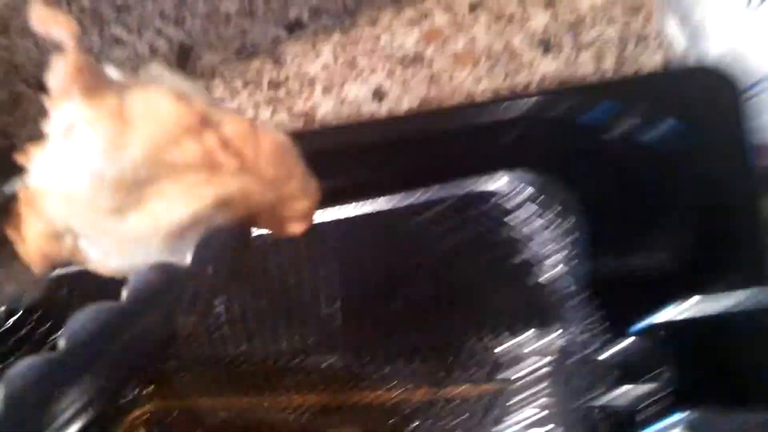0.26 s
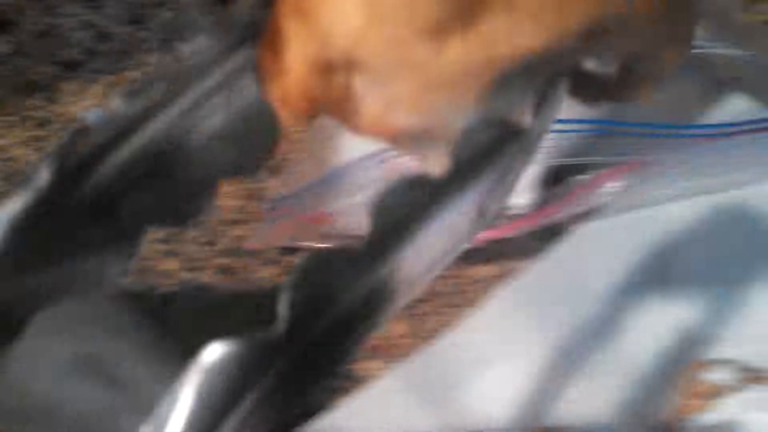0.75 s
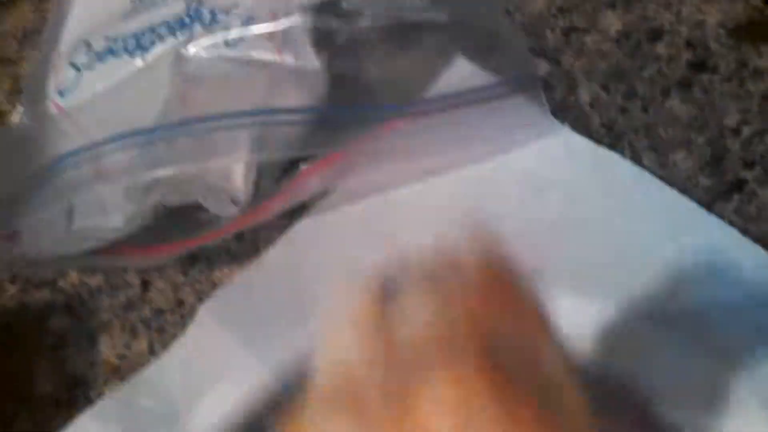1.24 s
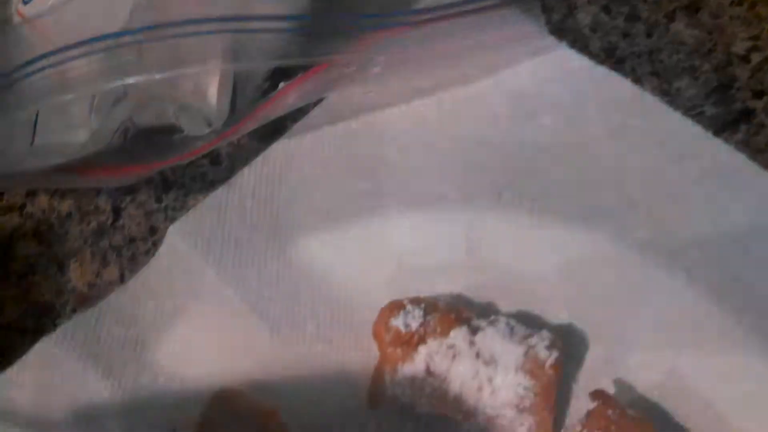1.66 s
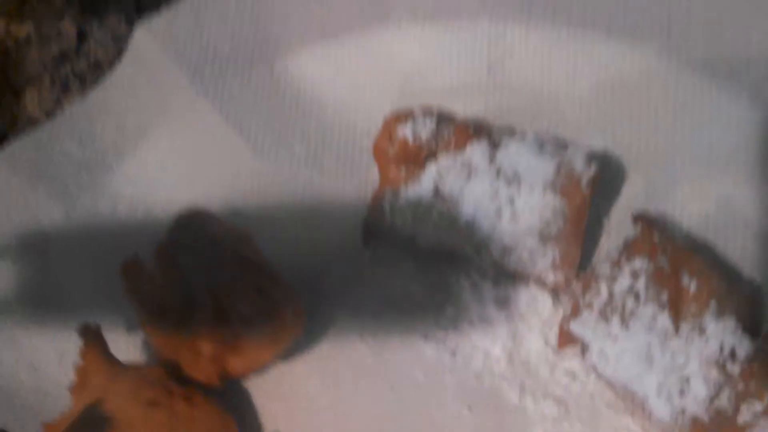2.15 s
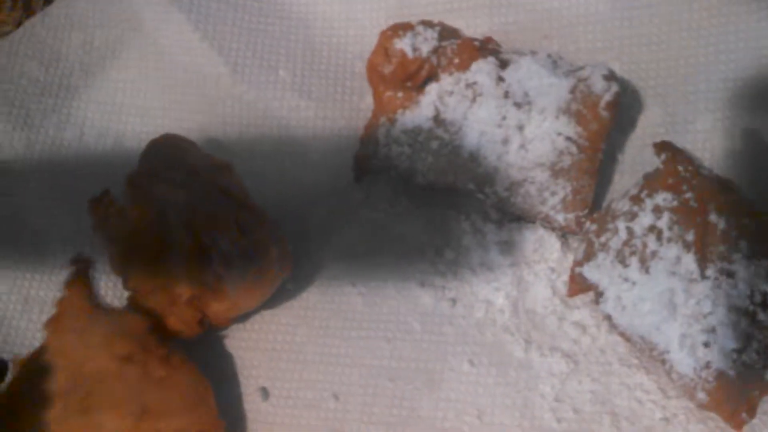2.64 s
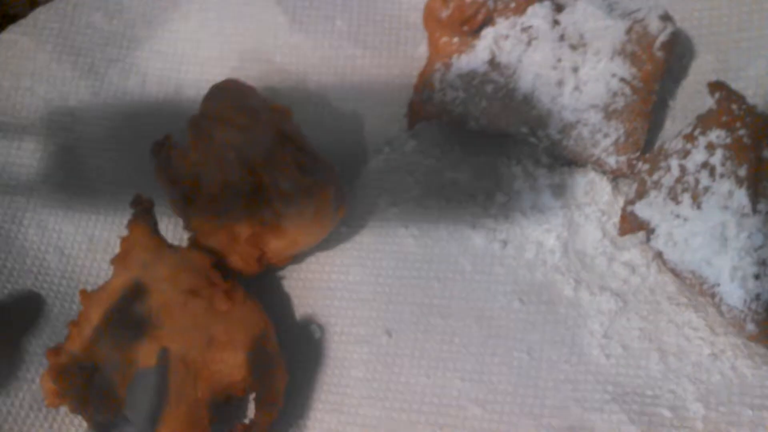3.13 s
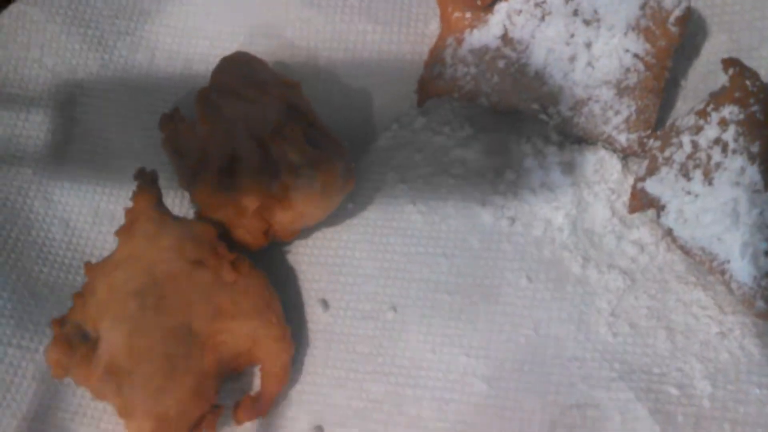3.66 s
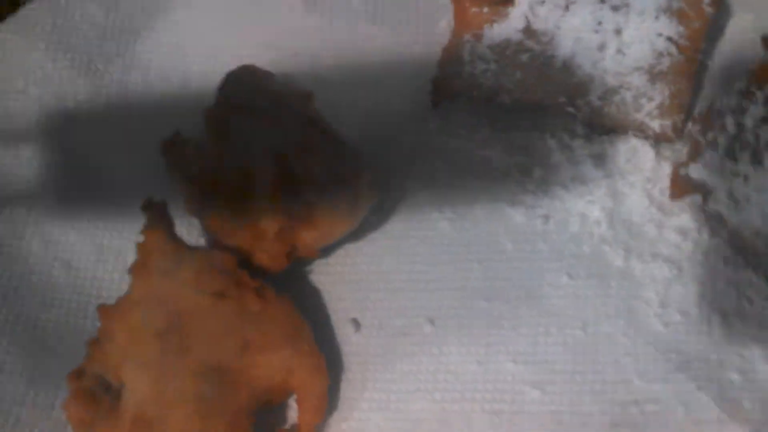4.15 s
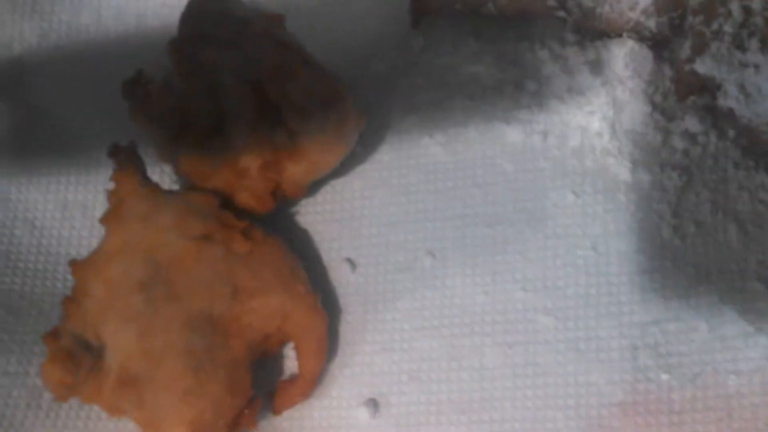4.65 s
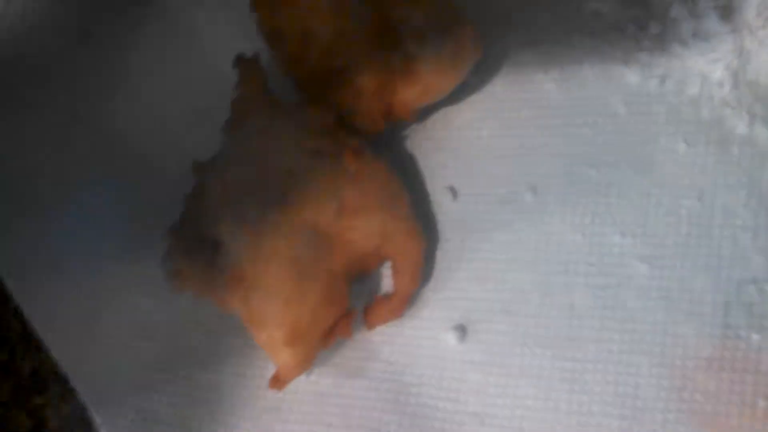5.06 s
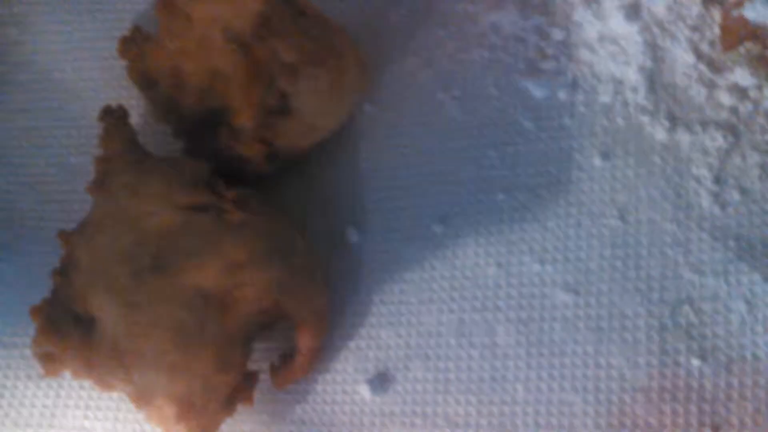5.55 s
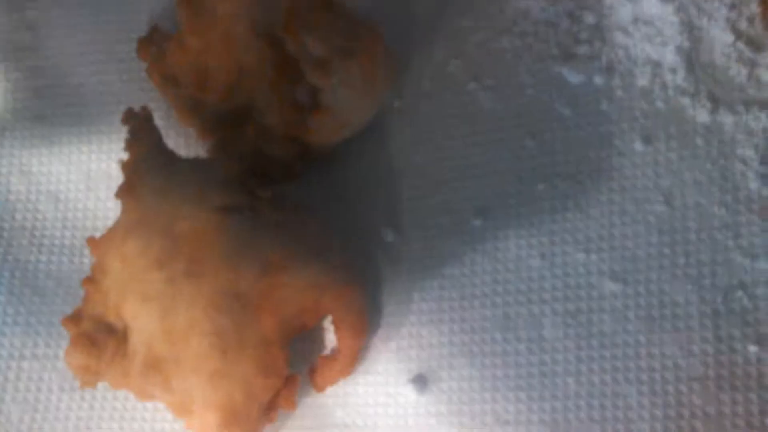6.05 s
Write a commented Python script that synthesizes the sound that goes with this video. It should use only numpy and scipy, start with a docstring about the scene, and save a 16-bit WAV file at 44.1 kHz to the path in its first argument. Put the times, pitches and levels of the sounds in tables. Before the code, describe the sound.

Close in a small kitchen, a few tiny oil spits crackle over soft air noise and faint low hum. Light, dry taps and brief steel scrapes come in uneven clusters as tongs set fried pastry on paper over a plate. After a pause, the tongs land on stone in three short ringing clanks, the middle one strongest. Finally a sharp knock and scrape open two plastic-bag rustles, with quick dull and clicky knocks to the end.

```python
"""Small kitchen: steel tongs lift a fried pastry from spitting oil onto a paper towel over a plate.
Knocks are noise rattles, harder contacts centred higher; scrapes are shaped runs of slips; bumps swing low.
The tongs land on the stone counter in three ringing clanks, built from steel modes.
Something, likely a plastic bag, is pulled twice and rustles: clumped snaps, creases. Air noise and hum lie behind.
Two close microphones are cross-subtracted into stereo."""
import sys
import numpy as np
from scipy import signal
from scipy.fft import rfft, irfft
from scipy.io import wavfile
from scipy.ndimage import uniform_filter1d

SR = 44100
rng = np.random.default_rng(int(sys.argv[2]) if len(sys.argv) > 2 else 0)


def put_to_file(sound):
    """Save the sound as 16-bit audio at rate SR, in the file named by the first command-line argument."""
    columns = np.atleast_2d(sound).T  # one column per channel
    safe = np.clip(columns, -1, 1)
    whole_steps = np.round(safe * 32767)
    wavfile.write(sys.argv[1], SR, whole_steps.astype(np.int16))


N = 277830

# air noise level: t/s, level/dB
AIR_LEVEL = [(0.0, -54.5), (0.56, -51), (1.55, -55.5), (2.13, -53), (3.68, -54), (4.57, -49.5),
             (4.95, -58.5), (5.4, -53)]
# spectra of air noise, bag film, sliding steel: f/Hz, level/dB
AIR_COLOUR = [(30, -18.5), (65, 2), (100, -2.5), (150, 0), (300, -0.5), (500, -4), (800, -12.5),
              (1200, -14.5), (2000, -16), (4000, -20.5), (7000, -23.5), (10300, -38.5), (12000, -34),
              (15500, -35)]
BAG_COLOUR = [(60, -36.5), (200, -3), (450, 0), (750, 1), (1100, 1), (1600, -2), (2400, -3), (3600, -8),
              (4600, -5.5), (6000, -7.5), (8000, -8), (9800, -18), (15500, -23)]
SLIDE_COLOUR = [(100, -64), (400, 10), (1200, 13.5), (2600, 15.5), (4200, 8), (7300, 8), (9800, -6),
                (15500, -15)]
# room decay: f/Hz, t60/s
ROOM_DECAY = [(150, 1), (600, 0.57), (1500, 0.27), (4000, 0.48), (8000, 0.47), (14000, 0.16)]
# pulls on the bag: start/s, swell/s, hold/s, level/dB
BAG_PULLS = [(5.435, 0.038, 0.2, -49), (5.738, 0.04, .55, -41.5)]
# loudest spits of hot oil: t/s, level/dB
LOUD_SPITS = [(0.175, -55), (0.289, -47.5), (0.315, -56), (0.543, -54), (0.6, -50.5), (0.672, -55),
              (0.792, -54), (1.108, -53)]
# slides of steel on mesh, paper, stone: t/s, length/s, level/dB, tilt/(dB/octave), peak/(share of length)
STEEL_SLIDES = [(0.348, 0.055, -50, -27, .3), (1.7, 0.018, -57, 2, 0.2), (1.881, 0.15, -48.5, -1, 0.36),
                (2.379, 0.079, -53, 1, 0), (2.479, 0.065, -51, 0.5, 0), (2.642, 0.11, -48, 0.5, 0.3),
                (4.029, 0.074, -50, -2, 1), (4.359, 0.079, -51, 1.5, 0.4), (5.587, 0.058, -34.5, 2.5, 0.6),
                (5.774, 0.06, -38, 5, 0)]
# dull bumps of hand and counter: t/s, level/dB, f/Hz
DULL_BUMPS = [(0.36, -40, 223), (0.475, -43, 163), (0.512, -63, 203), (1.998, -42.5, 160), (4.12, -35, 223),
              (4.134, -33, 214), (4.475, -43, 149), (4.717, -34, 306)]
# glancing single tones: t/s, level/dB, f/Hz, t60/s
GLANCING_PINGS = [(1.55, -35, 980, 0.021), (1.709, -47, 1230, 0.32), (1.953, -36.5, 7530, 0.045),
                  (2.543, -39.5, 6900, 0.019)]
# bands of a blow, thud to tick: low/Hz, high/Hz
CONTACT_BANDS = [(190, 640), (720, 1500), (1450, 2700), (2900, 5200), (5500, 8800)]
# knocks of tongs, pastry, plate, bag:
# t/s, level/dB, centre f/Hz, fall from centre/(dB/octave), t60 at 1 kHz/s, thud of surface beneath/dB
LIGHT_KNOCKS = [(0.365, -46.5, 800, 11, .1, -56), (0.722, -54, 3600, 9, .04, -62),
                (1.37, -59, 6500, 9, 0.024, -66), (1.62, -57, 6800, 12, .02, -66),
                (1.86, -37, 2470, 9.2, 0.029, -58), (1.9105, -40, 2840, 13, 0.026, -50),
                (1.92, -53, 3300, 11, .025, -52), (1.952, -48, 5000, 3, 0.063, -60),
                (1.9635, -36, 2090, 5.9, 0.048, -52), (1.995, -28, 520, 3.8, 0.065, -31),
                (2.0112, -35, 700, 3.6, 0.015, -46), (2.3547, -43.5, 1710, 4.4, 0.09, -25),
                (2.3835, -31, 960, 12.4, 0.013, -23), (2.395, -44.5, 1100, 8.9, 0.022, -56),
                (2.4047, -44, 7000, 8.3, 0.05, -54), (2.485, -49, 7500, 7.1, 0.046, -60),
                (2.492, -45, 3830, 4.7, 0.053, -62), (2.502, -53, 2400, 3.8, .02, -57),
                (2.628, -40, 590, 5.3, 0.044, -56), (2.6798, -39.5, 6540, 1.1, 0.034, -24),
                (3.302, -52.5, 700, 3, 0.024, -26), (3.372, -40.5, 2800, 1.1, 0.034, -23),
                (3.399, -32.5, 327, 3.4, 0.032, -44), (3.408, -50.5, 900, 0.93, 0.036, -46),
                (3.5787, -36.5, 407, 4.6, 0.039, -60), (4.369, -39.5, 4000, 4.3, 0.095, -57),
                (4.717, -32, 970, 4.8, 0.038, -29), (5.5815, -42, 2000, 0.8, .03, -52),
                (5.5842, -23, 750, 2.4, 0.048, -19), (5.629, -25.5, 935, 5.5, 0.027, -42),
                (5.634, -35, 5000, 1.7, 0.065, -50), (5.6658, -30.5, 550, 5.6, .05, -44),
                (5.774, -34, 4000, 3.8, 0.054, -52), (5.915, -34, 900, 7, .04, -40),
                (5.985, -31.5, 2950, 4.3, 0.055, -48), (6.046, -33, 940, 14, 0.037, -52),
                (6.189, -30.5, 1080, 13, 0.012, -54), (6.221, -21.5, 1480, 22, 0.012, -52),
                (6.2599, -31.5, 1960, 2.9, 0.036, -58), (6.272, -36, 7000, 6.6, 0.049, -54)]
# tongs modes: f/Hz, free t60/s, level struck on arm/dB, level struck at tip/dB
TONGS_MODES = [(300, 0.15, -5, -14), (364, 0.25, -11, -13), (480, 0.12, -9, -18), (686, 0.35, -9, -17),
               (1102, 0.2, -6, -13), (1155, 0.12, -2, -11), (1243, 0.14, 1, -9), (1400, 0.1, -2, -11),
               (1533, 0.18, -3, -18), (2050, 0.08, -4, -13), (2157, 0.12, 8, -6), (2275, 0.09, -1, -16),
               (2390, 0.09, 1, -12), (3050, 0.09, -5, -2), (3168, 0.075, -6, 7), (3230, 0.09, -7, 1),
               (3290, 0.06, -7, -2), (3530, 0.07, -7, -9), (3669, 0.4, -13, -6), (3798, 0.38, -10, -6),
               (3918, 0.2, -4, -14), (4133, 0.05, -1, -6), (4280, 0.06, -5, -12), (4450, 0.2, -10, -12),
               (4854, 0.14, 1, -11), (5705, 0.16, -13, -2), (6200, 0.2, -18, -7), (6503, 0.11, -21, -3),
               (7000, 0.15, -10, -13), (7171, 0.15, -17, -5), (7650, 0.1, -22, -8)]
# steel on something hard: t/s, blow/dB, centre f/Hz, fall from centre/(dB/octave), t60 at 1 kHz/s,
# ring/dB, place (0 arm, 1 tip), hand's muting of modes below centre/(dB/octave)
STEEL_CLANKS = [(1.704, -41.5, 4300, 2.5, 0.12, -56, 0.35, 13),
                (4.115, -25, 4470, 7.5, 0.059, -29, 0.11, 9.5),
                (4.4723, -16, 1400, 7.5, 0.055, -16, 0.027, -1.5),
                (4.6818, -23, 5570, 5.5, 0.045, -17, 1, -1.5)]

TIME_S, FFT_HZ = np.arange(N) / SR, np.fft.rfftfreq(N, 1 / SR)
MIC_SPACING_SAMPLES, EDGE_HZ = 16, 15750
PULL_RELEASE_S = 0.08
CREASES_PER_S, CREASE_HZ, CREASE_DB = 70, (700, 10000), (-8, 2.5)
SMALL_SPITS_PER_S, SMALL_SPIT_DB, FRYER_LEFT_S = 9, (-64, -56), .8
SLIDE_EDGE = .55  # pressure at both ends, against 1 at the peak
COUNTER_T60_S = 0.15
THUD_HZ, THUD_T60_S = 270, 0.0073
REBOUND_S, REBOUND_GAIN = .0011, .45  # delay varies by 0.5 to 2 times
CONTACT_T60_S, FREE_RING_DB = 0.036, -17
SIDE_SPREAD, SIDE_DB = 0.07, -14.5  # side modes: relative spread, level each


def amp(db):
    """Decibels to gain."""
    return 10 ** (np.asarray(db) / 20)


def evened(x, size=None):
    """Scales to rms 1 over all of x, or over its first samples."""
    return x / np.sqrt(np.mean(x[..., :size] ** 2) + 1e-20)


def read(points, hz):
    """Interpolates a curve on a log-frequency axis."""
    f, value = np.transpose(points)
    return np.interp(np.log(hz + 1), np.log(f), value)


def add(mix, s, sound):
    """Lays a sound into the mix at time s."""
    part = mix[max(round(s * SR), 0):][:len(sound)]
    part += sound[:len(part)]


def band(x, lo_hz, hi_hz, order=2):
    """Causal band-pass."""
    sos = signal.butter(order, [lo_hz, min(hi_hz, .49 * SR)], "band", fs=SR, output="sos")
    return signal.sosfilt(sos, x)


def diffuse(pair, apart=0.12):
    """Sound from all sides: the two microphones agree chiefly on long waves."""
    same = (1 - np.clip(apart, 0, 1)) * np.sinc(2 * FFT_HZ * MIC_SPACING_SAMPLES / SR)
    common, odd = rfft(pair, N) * np.sqrt([(1 + same) / 2, (1 - same) / 2])
    return irfft([common + odd, common - odd], N)


def kitchen(x, lag_ms, near_db, room_db, near_t60_s=0.018, shadow_db=-5):
    """Direct sound, early scatter from counter and hands, and the room tail."""
    t = np.arange(SR // 2) / SR
    hz, at, z = signal.stft(rng.standard_normal((2, len(t))), SR, nperseg=256)
    z = z * amp(-60 * at / read(ROOM_DECAY, hz)[:, None])
    tail = signal.istft(z, SR, nperseg=256)[1][:, :len(t)] * np.minimum(t / 0.0085, 1)
    near = rng.standard_normal((2, len(t))) * amp(-60 * t / near_t60_s) * np.minimum(t / 0.0057, 1)
    echoes = amp(room_db) * tail / np.linalg.norm(tail[0])
    echoes = echoes + amp(near_db) * near / np.linalg.norm(near[0])
    # second microphone: duller, and later where the lag is positive
    delay = np.exp(-2j * np.pi * FFT_HZ * lag_ms / 1000)
    second = amp(read([(200, 1.0), (4000, shadow_db)], FFT_HZ)) * delay
    direct = np.array([np.ones(len(FFT_HZ)), second])
    paths = irfft(rfft(diffuse(echoes)) + direct, N)
    # 64 samples of room for a negative lag, removed after convolution
    paths = np.roll(paths, 64, axis=1)[:, :len(t)]
    return signal.fftconvolve(x[None], paths, axes=1)[:, 64:N + 64]


def grains(count, per_s, spread_db, smooth):
    """Stick-slip: tiny snaps of very uneven size over a smooth hiss."""
    size = amp(spread_db * np.minimum(rng.exponential(1, count), 4)) * rng.standard_normal(count)
    snaps = evened(size * (rng.random(count) < per_s / SR))
    return evened(snaps + smooth * rng.standard_normal(count))


def blow(db, centre_hz, fall_db, t60_s, fizz_db, push, treble_damping=0.55):
    """A sharp push and a dense rattle whose treble dies first; the band nearest the centre leads."""
    t = np.arange(SR // 5) / SR
    rattle, out = rng.standard_normal(len(t)), np.zeros(len(t))
    for k, (lo, hi) in enumerate(CONTACT_BANDS):
        hz = np.sqrt(lo * hi)
        band_t60_s = max(t60_s * (1000 / hz) ** treble_damping, .004)
        force = rattle * amp(-60 * t / band_t60_s)
        force[0] += push * (-1) ** k
        gain = amp(db - fall_db * abs(np.log2(hz / centre_hz)))
        out += gain * evened(band(force, lo, hi), size=256)
    # fizz follows the top band's force and gain
    return out + gain * amp(fizz_db) * evened(band(force, 9000, 15000), size=256)


def background(air_db=4.5, hum_db=-63):
    """Air noise of drifting level and the low, narrow-band hum of an appliance."""
    noise = rfft(diffuse(rng.standard_normal((2, N))))
    air = evened(irfft(noise * amp(read(AIR_COLOUR, FFT_HZ)), N))
    hum = evened(diffuse(band(rng.standard_normal((2, N)), 150.0, 157.6)))
    level_db = air_db + np.interp(TIME_S, *np.transpose(AIR_LEVEL))
    return air * amp(level_db) + amp(hum_db) * hum


def film(clump_db=0.5, patch_db=2.5):
    """Sliding film crinkles: folds snap in clumps per band, and time-frequency patches vary as it bends."""
    edges_hz = [0, 500, 1100, 2400, 5500, SR]
    folds = np.zeros(len(FFT_HZ), complex)
    for lo, hi in zip(edges_hz, edges_hz[1:]):
        clumps = evened(band(rng.standard_normal(N + SR), 5, 70)[SR:])
        slips = grains(count=N, per_s=800, spread_db=3.2, smooth=0.45) * amp(clump_db * clumps)
        folds += rfft(slips) * (FFT_HZ >= lo) * (FFT_HZ < hi)
    z = signal.stft(irfft(folds * amp(read(BAG_COLOUR, FFT_HZ)), N), nperseg=512)[2]
    patches = uniform_filter1d(rng.standard_normal(z.shape), size=5, axis=0)
    patches = evened(uniform_filter1d(patches, size=7, axis=1))
    return evened(signal.istft(z * amp(patch_db * patches), nperseg=512)[1][:N])


def creases():
    """Single creases snap over at random times, each at its own pitch."""
    out, start = np.zeros(N), BAG_PULLS[0][0]
    length = N / SR - start
    for when, pitch, size in rng.random((round(CREASES_PER_S * length), 3)):
        hz = CREASE_HZ[0] * (CREASE_HZ[1] / CREASE_HZ[0]) ** pitch
        db = np.interp(size ** 2, [0, 1], CREASE_DB)
        add(out, start + when * length, blow(db, hz, fall_db=8, t60_s=0.013, fizz_db=-7, push=12))
    return out


def pulling(jerk_db=1.5):
    """Pull strength: each pull swells, holds and lets go, with small jerks throughout."""
    pulls = np.zeros(N)
    for start, swell, hold, db in BAG_PULLS:
        corners_s = start + np.cumsum([0, swell, hold, PULL_RELEASE_S])
        pulls += amp(db) * np.interp(TIME_S, corners_s, [0, 1, 1, 0])
    jerks = evened(band(rng.standard_normal(N + SR), 3.7, 39)[SR:])
    return pulls * amp(jerk_db * jerks)


def bag(around_db=1.5):
    """The nearest folds sound straight at the microphones, the rest of the bag from all around."""
    pull = pulling()
    nearest = (film() + creases()) * pull
    nearest = kitchen(nearest, lag_ms=0.27, near_db=-12, room_db=-12, near_t60_s=0.015)
    return nearest + amp(around_db) * diffuse(np.array([film(), film()]) * pull)


def spits(t60_s=0.0082):
    """Bubbles burst in the oil as short noise bursts; small ones fall at random until the pastry has left."""
    out, t = np.zeros(N), np.arange(1024) / SR
    count = round(SMALL_SPITS_PER_S * FRYER_LEFT_S)
    small = rng.uniform([0, SMALL_SPIT_DB[0]], [FRYER_LEFT_S, SMALL_SPIT_DB[1]], (count, 2))
    for s, db in [*LOUD_SPITS, *small]:
        burst = rng.standard_normal(len(t)) * amp(-60 * t / t60_s)
        add(out, s, amp(db) * evened(band(burst, 4800, 8600), size=256))
    return out


def slides():
    """Each slide is a short run of fine slips whose pressure swells to a peak and eases off."""
    out = np.zeros(N)
    for s, length_s, db, tilt_db, peak in STEEL_SLIDES:
        slips = grains(count=8192, per_s=1200, spread_db=1.36, smooth=0.048)
        hz = np.fft.rfftfreq(len(slips), 1 / SR)
        colour_db = read(SLIDE_COLOUR, hz) + tilt_db * np.log2(hz + 200)
        rub = irfft(rfft(slips) * amp(colour_db))[:round(length_s * SR)]
        share = np.linspace(0, 1, len(rub))
        pressure = np.interp(share, [0, np.clip(peak, 0, 1), 1], [SLIDE_EDGE, 1, SLIDE_EDGE])
        add(out, s, amp(db) * evened(rub) * pressure * signal.windows.tukey(len(rub), .1))
    return out


def bumps(width_ratio=1.6, rise_s=0.0009, swing_t60_s=0.036, swing=1.1):
    """Soft, heavy contacts: a few slow swings and a longer low murmur of the counter."""
    out, t = np.zeros(N), np.arange(SR // 3) / SR
    for s, db, hz in DULL_BUMPS:
        murmur = band(rng.standard_normal(len(t)), hz / width_ratio, hz * width_ratio)
        murmur = evened(murmur, size=2048) * amp(-60 * t / COUNTER_T60_S)
        swings = swing * np.sin(2 * np.pi * hz * t) * amp(-60 * t / swing_t60_s)
        add(out, s, amp(db) * (swings + murmur) * (1 - np.exp(-t / rise_s)))
    return out


def pings(rise_s=0.00046):
    """A glancing touch wakes a single mode of the plate or the tongs."""
    out, t = np.zeros(N), np.arange(SR // 2) / SR
    for s, db, hz, t60_s in GLANCING_PINGS:
        tone = np.sin(2 * np.pi * hz * t) * (1 - np.exp(-t / rise_s))
        add(out, s, amp(db - 60 * t / t60_s) * tone)
    return out


def knocks(push=8):
    """Damped contacts that touch twice; pastry and paper stop any ring, the surface beneath thuds briefly."""
    out, t = np.zeros(N), np.arange(SR // 10) / SR
    thud = np.sin(2 * np.pi * THUD_HZ * t) * amp(-60 * t / THUD_T60_S)
    for s, db, centre_hz, fall_db, t60_s, thud_db in LIGHT_KNOCKS:
        add(out, s, blow(db, centre_hz, fall_db, t60_s, fizz_db=-9.5, push=push))
        rebound = REBOUND_GAIN * blow(db, centre_hz, fall_db, t60_s / 2, fizz_db=-10, push=push)
        add(out, s + REBOUND_S * rng.uniform(.5, 2), rebound)
        add(out, s, amp(thud_db) * thud)
    return out


def clanks(rise_s=0.0014):
    """Bare steel rings in a dense cluster of modes; the place struck decides which ones speak."""
    out, t = np.zeros(N), np.arange(SR // 2) / SR
    hz, t60_s, arm_db, tip_db = np.transpose(TONGS_MODES)[:, :, None]
    # contact soaks up most of the ring at once; the rest decays freely
    decay = amp(-60 * t / CONTACT_T60_S) + amp(FREE_RING_DB - 60 * t / t60_s)
    mains = np.sin(2 * np.pi * hz * t + np.arange(len(hz))[:, None] ** 2)
    # thin steel: seven weak side modes scattered round each main one
    sides = np.zeros_like(mains)
    for shift, turn in rng.uniform(-1.4, 1, size=(7, 2, len(hz), 1)):
        sides += np.sin(2 * np.pi * hz * (1 + SIDE_SPREAD * shift) * t + np.pi * turn)
    for s, db, centre_hz, fall_db, blow_t60_s, ring_db, place, grip_db in STEEL_CLANKS:
        place = np.clip(place, 0, 1)
        muting_db = grip_db * np.minimum(np.log2(hz / centre_hz), 0)
        mode_db = arm_db + place * (tip_db - arm_db) + muting_db
        modes = amp(mode_db) * decay * (mains + amp(SIDE_DB) * sides)
        ring = evened(modes.sum(0) * (1 - np.exp(-t / rise_s)), size=256)
        add(out, s, amp(ring_db) * ring)
        # more fizz towards the hard tip
        fizz_db = -10 + 4.4 * place
        add(out, s, blow(db, centre_hz, fall_db, t60_s=blow_t60_s, fizz_db=fizz_db, push=5.4))
    return out


def scene():
    """Everything, as it reaches the two microphones."""
    rubs = kitchen(slides(), lag_ms=0.198, near_db=3.5, room_db=-15, near_t60_s=0.02)
    counter = kitchen(bumps(), lag_ms=-0.14, near_db=-1.0, room_db=-32.0, near_t60_s=0.16)
    taps = kitchen(spits() + pings() + knocks(), lag_ms=0.3, near_db=-10, room_db=-15,
                   near_t60_s=0.025, shadow_db=-8)
    steel = kitchen(clanks(), lag_ms=0.31, near_db=-8, room_db=-12, near_t60_s=0.022, shadow_db=-8)
    return background() + bag() + rubs + counter + taps + steel


def record(dry, shelf_hz=540, low_hz=50, right_db=1.86):
    """Each side subtracts the other, delayed by the spacing; bass shelf, louder right side, band limit."""
    other = np.pad(dry[::-1], ((0, 0), (MIC_SPACING_SAMPLES, 0)))[:, :N]
    crossed = (dry - other) / np.sqrt(2)
    # the subtraction thins the bass; the shelf restores it
    shelf = signal.bilinear([1, 2 * np.pi * shelf_hz], [1, 2 * np.pi * low_hz], SR)
    high_pass = signal.butter(2, low_hz, "high", fs=SR, output="sos")
    full = signal.sosfilt(high_pass, signal.lfilter(*shelf, crossed))
    full = full * amp([[-right_db / 2], [right_db / 2]])
    low_pass = signal.firwin(511, EDGE_HZ, window=("kaiser", 9), fs=SR)
    return signal.oaconvolve(full, low_pass[None], "same")


dry = scene()
out = record(dry)
put_to_file(out)
```